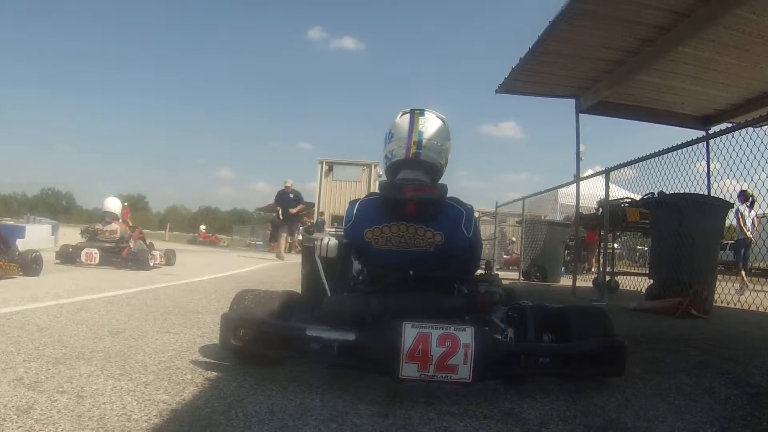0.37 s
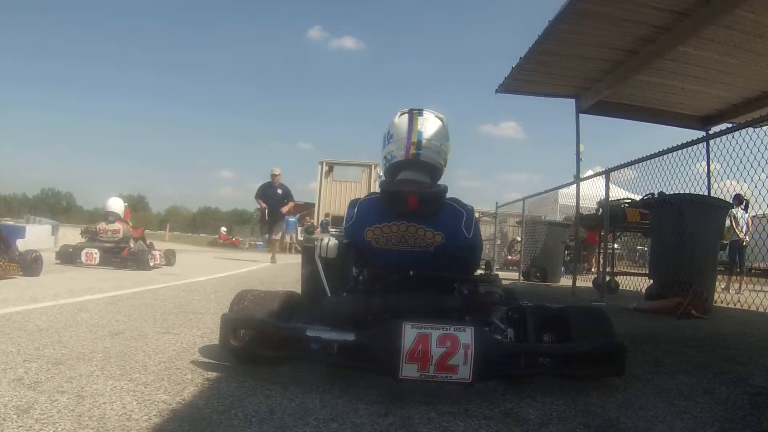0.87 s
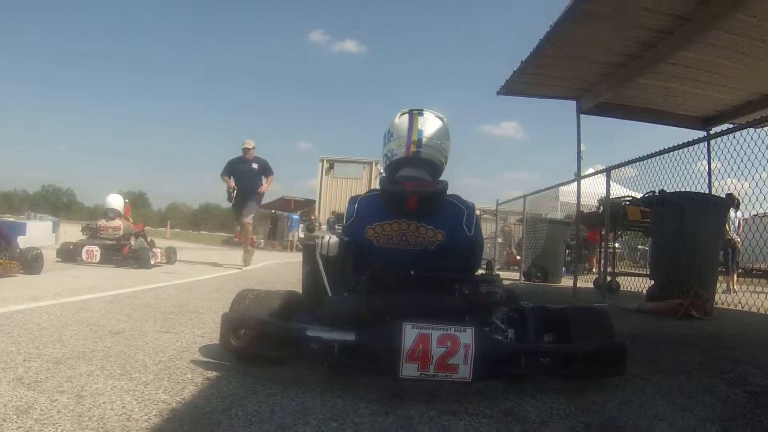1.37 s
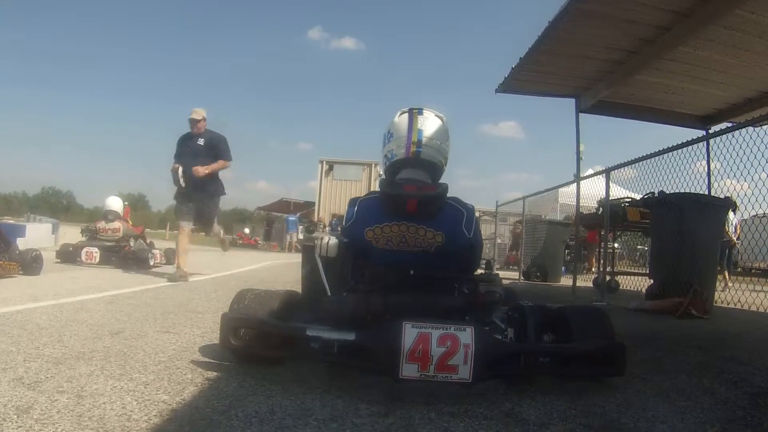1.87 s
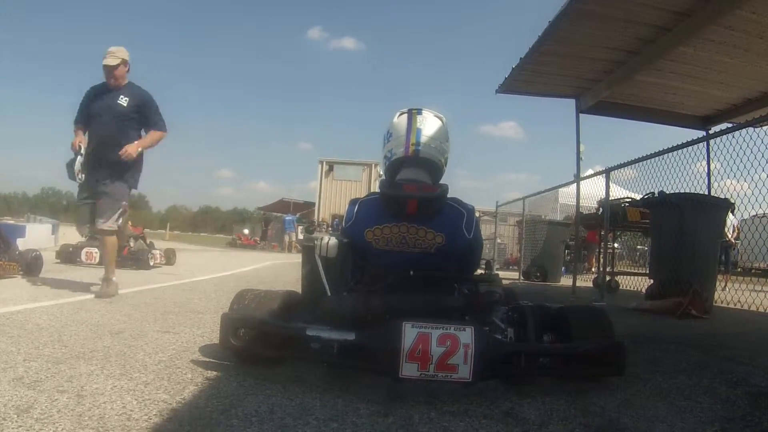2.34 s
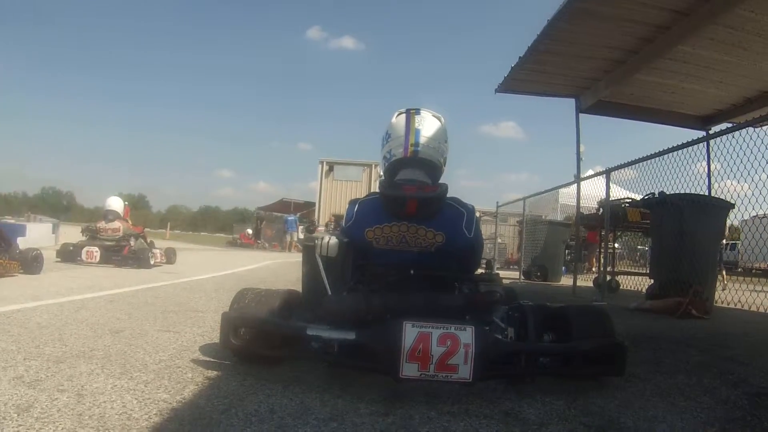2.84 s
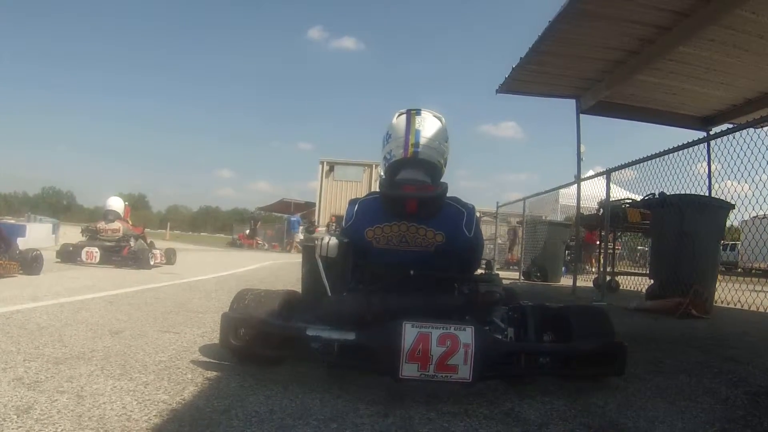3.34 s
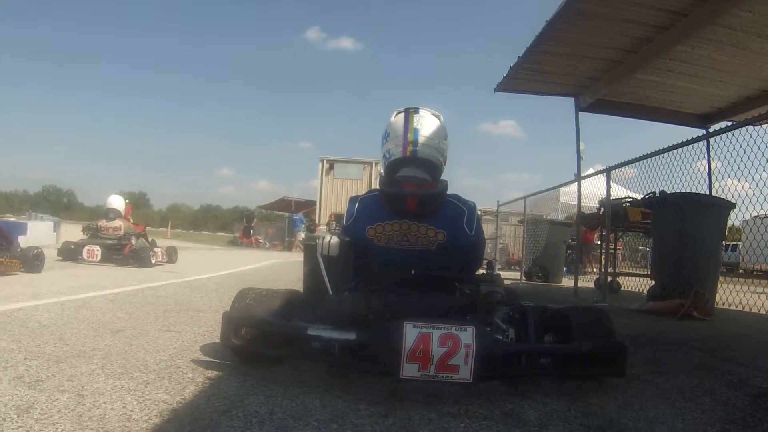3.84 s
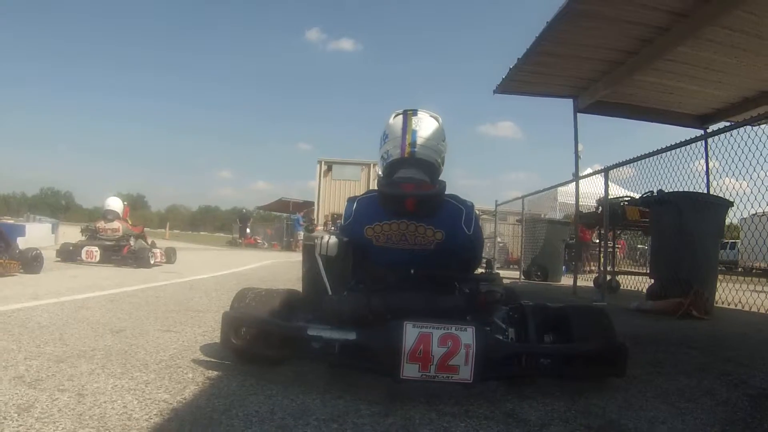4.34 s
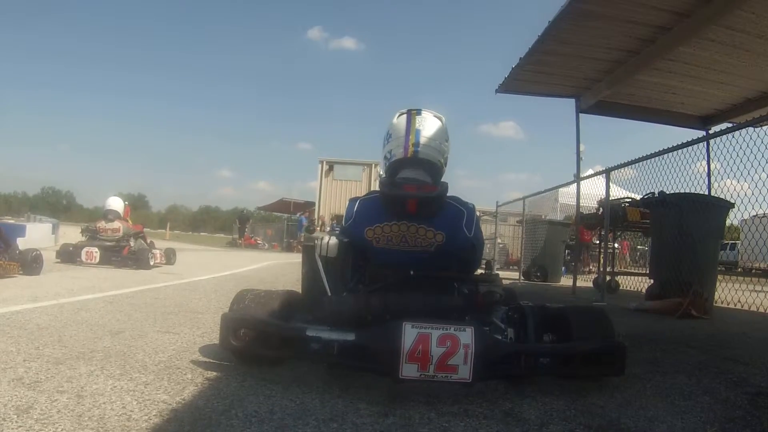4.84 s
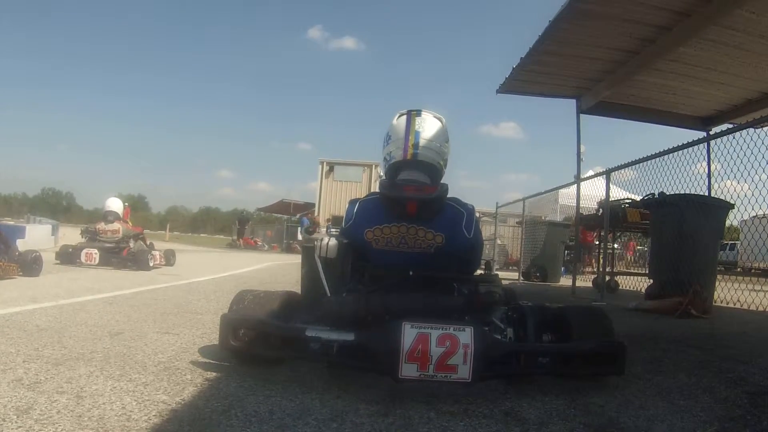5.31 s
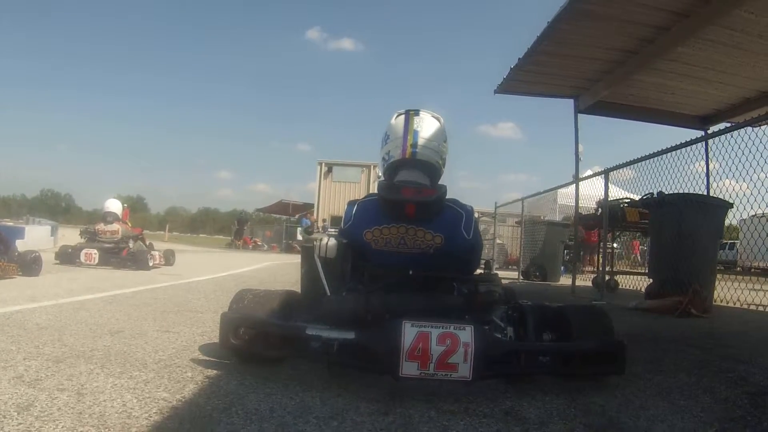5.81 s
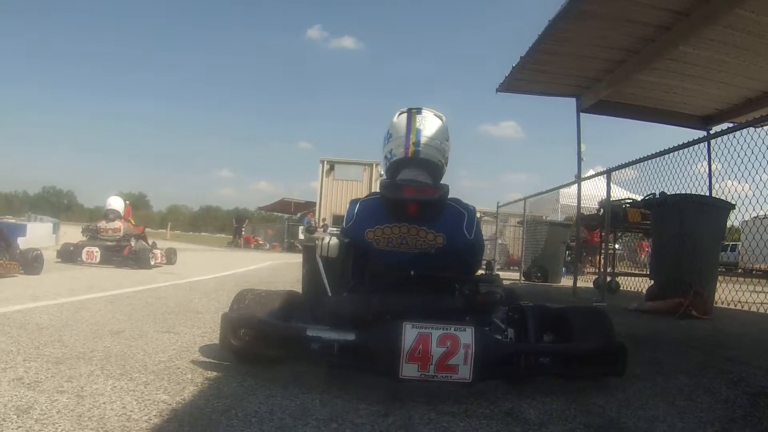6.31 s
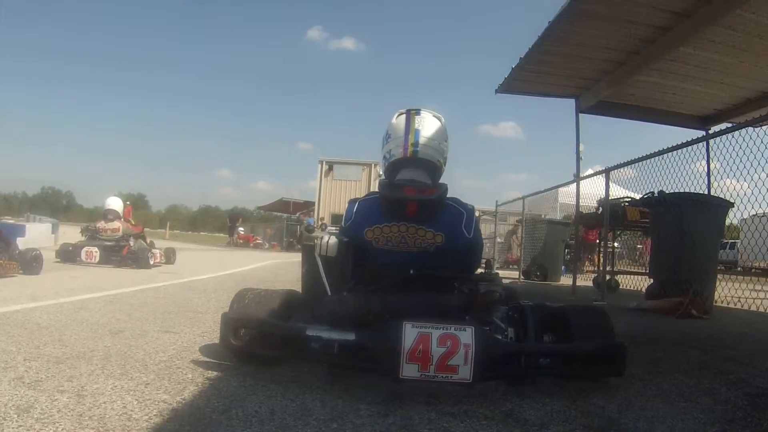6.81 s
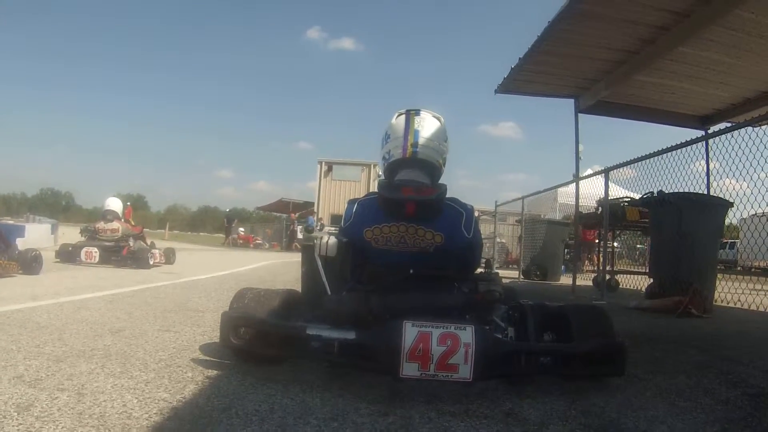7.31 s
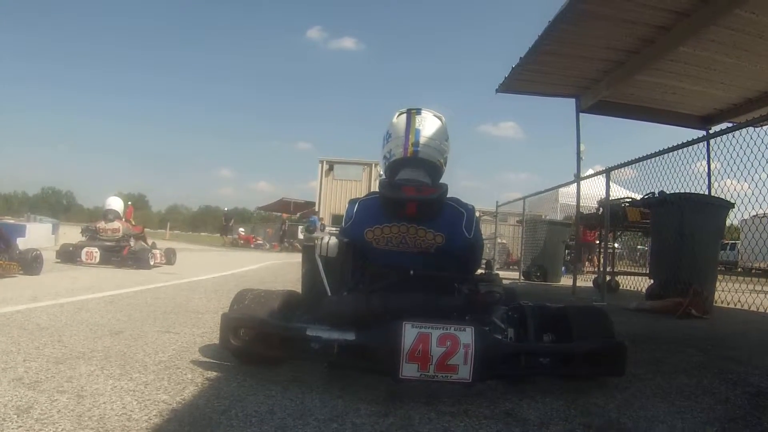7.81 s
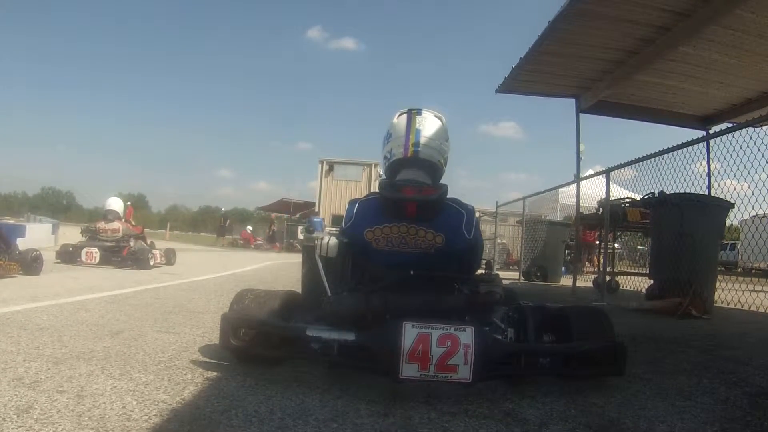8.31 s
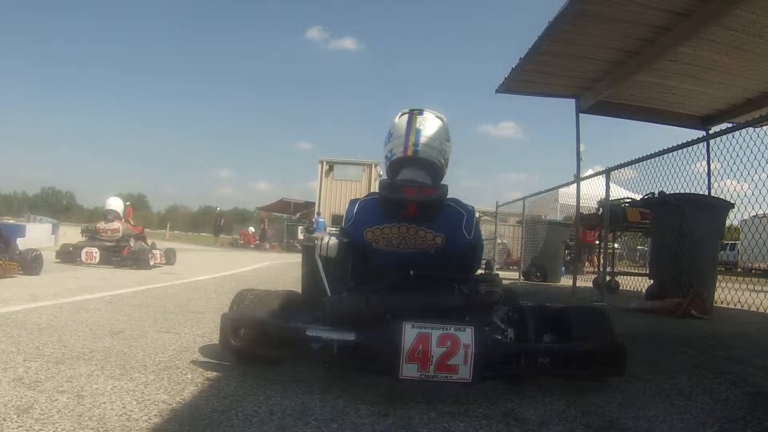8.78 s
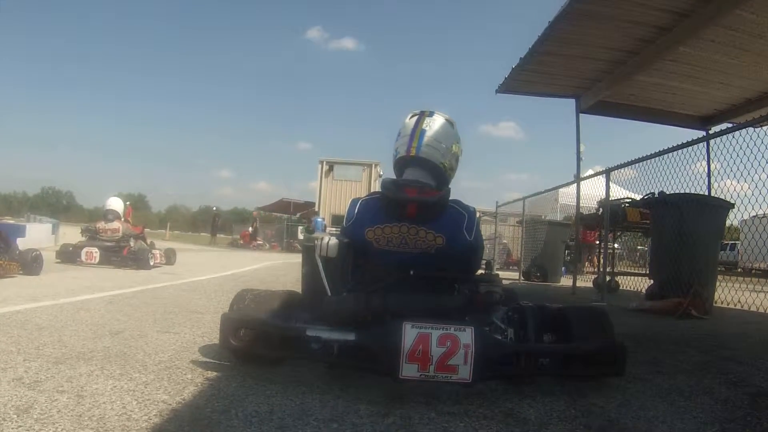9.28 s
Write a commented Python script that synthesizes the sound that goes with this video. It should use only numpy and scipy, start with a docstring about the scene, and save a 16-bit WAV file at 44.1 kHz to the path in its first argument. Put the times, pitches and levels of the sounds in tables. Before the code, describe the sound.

A rough two-stroke kart engine blips and rattles close to the microphone, sinks and stalls near eight seconds, leaving a neighbour's popping idle.

```python
"""A rough two-stroke engine shakes a camera on a kart, over the drone of a grid and a neighbour's idling pops.
The near engine sums shaft orders, frame ringing, burning noise and clatter; it hunts, fires unevenly and stalls.
Strong firings jolt the mount, and knocks and loose chatter ring the housing, most densely at high revs.
Distant engines are patchy noise with thin hissing bands; the neighbour's pops are struck exhaust rings.
After the stall the mount sways, and the camera's gain control slowly lifts what is left."""
import sys
import numpy as np
from scipy import signal
from scipy.io import wavfile
from scipy.ndimage import uniform_filter1d

SR = 44100
rng = np.random.default_rng(int(sys.argv[2]) if len(sys.argv) > 2 else 0)


def natural_amplitude(level_db):
    """Convert a level in decibels to a linear amplitude factor, elementwise."""
    exponent = np.asarray(level_db, float) / 20
    return 10 ** exponent


def transcribe(u):
    """Save the signal u as a 16-bit wav file named by the first command-line argument.

    u: samples, shape (n,) or (channels, n), limited to [-1, 1]; the rate is SR.
    q: integer samples, one column per channel.
    """
    v = np.clip(np.atleast_2d(u).T, -1, 1)
    q = np.round(v * 32767).astype(np.int16)
    wavfile.write(sys.argv[1], SR, q)


N = 426006


def evened(x):
    """Scales to rms 1."""
    return x / np.sqrt(np.mean(x ** 2) + 1e-20)


def curves(rows):
    """Joins table rows by straight lines, one array for each column after time."""
    s, *columns = np.transpose(rows)
    return [np.interp(np.arange(N) / SR, s, c) for c in columns]


def clicks(s, size):
    """Single samples of the given size at the given times."""
    train = np.zeros(N)
    places = np.clip(np.round(np.asarray(s) * SR).astype(int), 0, N - 1)
    np.add.at(train, places, size)
    return train


def ring(x, modes, turn=1):
    """Passes x through decaying resonances of joint energy 1; turn -1 fills the dips between neighbours."""
    t = np.arange(8192) / SR
    body = np.zeros(len(t))
    for k, (hz, width, db) in enumerate(modes):
        decay = np.exp(-np.pi * width * t) * (1 - np.exp(-hz * t))
        body += turn ** k * natural_amplitude(db) * np.sqrt(width) * decay * np.sin(2 * np.pi * hz * t)
    return signal.oaconvolve(x, body / np.linalg.norm(body))[:N]


# near engine's speed and effort: [t/s, shaft speed/(turns per s), effort level/dB]
ENGINE_SPEED = [(0, 49.5, -9.5), (.09, 47.4, -3.5), (.18, 33.8, -1), (.33, 35, -0.5), (.41, 37.4, -3.5),
                (.52, 37.4, 2), (.62, 33.4, 0), (.8, 31, -2), (.85, 27.2, -2), (.91, 30.4, -1.5),
                (1.0, 27.3, -1.5), (1.12, 27.5, 0), (1.2, 39, -1.5), (1.3, 53.6, -4.5), (1.43, 51.5, -9),
                (1.62, 52.8, -6), (1.71, 47, -5.5), (1.88, 45, -0.5), (2.04, 41, -1.5), (2.1, 45.1, -3.5),
                (2.22, 43.5, 0), (2.28, 39, 2), (2.45, 30.3, 0), (2.62, 28.2, -3), (2.68, 33.6, -3.5),
                (2.88, 25.4, -1), (3.01, 46, -1.5), (3.17, 35.4, -1), (3.27, 50.3, -3.5), (3.38, 47.6, -4),
                (3.5, 39.2, -0.5), (3.7, 30.6, -1.5), (3.82, 25.3, 0.5), (4.1, 25, 1), (4.14, 30.9, -3.5),
                (4.38, 24.1, -0.5), (4.47, 33.8, -1), (4.52, 47.3, -4), (4.61, 54.5, -11), (4.8, 39, -2.5),
                (5.0, 31, 0), (5.08, 32, -2), (5.2, 33, -3), (5.24, 32.8, -6), (5.39, 26, -1),
                (5.45, 28.3, -4), (5.86, 21.8, 3), (5.93, 32.1, -2.5), (6.12, 24.4, -1.5), (6.22, 28.4, -1),
                (6.35, 28, -4.5), (6.43, 43, -4.5), (6.59, 43.2, 0.5), (6.75, 35, 0.5), (6.9, 25.5, 0.5),
                (7.0, 20.2, 3), (7.15, 20.1, 5.5), (7.28, 20.8, -1), (7.56, 20.3, 0.5), (7.62, 18, 2.5),
                (7.81, 16.5, -1.5), (8.1, 21.3, -12)]
# shaft orders: [multiple of shaft speed, level/dB, phase/rad]
SHAFT_ORDERS = [(1, -17, 0.5), (2, -18, 0.72), (3, -26.5, 2.1), (4, -34.5, 3), (5, -31, 3.64),
                (6, -35.5, 0.03), (7, -43, 1.98)]
# how the mount passes shaking on to the microphone: [f/Hz, level/dB]
MOUNT_RESPONSE = [(14, -11.5), (22, -1), (30, 2), (40, -11.5), (52, -14), (65, -4), (80, 1), (92, 3),
                  (101, 0.5), (112, -8), (128, -6), (150, -5), (195, 3), (235, -8.5), (295, 6), (340, -2.5),
                  (420, -43)]
# frame and pipe resonances: [f/Hz, width/Hz, level/dB]
FRAME_MODES = [(99.8, 23, 8.5), (156.3, 70, 3), (207.4, 53.3, 7), (256.8, 34.6, 2), (288.6, 28.5, 5),
               (335, 40, -18), (412, 150, -40.5), (570, 180, -52.5)]
# soft camera mount: [f/Hz, width/Hz, level/dB]
MOUNT_MODES = [(20.5, 15, -2), (55.3, 68, 13)]


def engine():
    """Shaft orders shake the mount; each turn kicks the frame with a pulse and a puff of noise, and clatters."""
    hz, effort_db = curves(ENGINE_SPEED)
    turns = np.cumsum(hz) / SR
    since_turn = turns % 1
    stop_s = ENGINE_SPEED[-1][0]
    running = np.clip((stop_s - np.arange(N) / SR) / 0.18, 0, 1)
    # coasting: slowing down from above 32.2 turns a second; burning noise drops and firing is steadier
    coasting = uniform_filter1d(1. * (np.gradient(hz) < 0) * (hz > 32.2), size=3000)
    steadiness = 1 - coasting / 2
    coast_gain = natural_amplitude(-1.5 * coasting)
    stall_db = 4.5 * np.maximum(21 - hz, 0)  # ringing dies below 21 turns a second

    # each order wavers a few times a second
    waver = rng.standard_normal((len(SHAFT_ORDERS), N // 400 + 1))
    waver = uniform_filter1d(waver, size=8, axis=1)
    f, passed_db = np.transpose(MOUNT_RESPONSE)
    orders = np.zeros(N)
    for (k, db, phase), w in zip(SHAFT_ORDERS, waver):
        waver_db = 3.5 * np.interp(np.arange(N) / 400, np.arange(len(w)), evened(w))
        mount_db = np.interp(np.log(k * hz), np.log(f), passed_db)
        level_db = db + effort_db + mount_db + waver_db * steadiness - (k > 1.5) * stall_db
        orders += natural_amplitude(level_db) * np.cos(2 * np.pi * round(k) * turns + phase)

    # the frame rings harder just after a strong firing
    after_db, after_s = 10, 0.012
    s, db = np.transpose(STRONG_FIRINGS)
    hits = clicks(s, np.minimum(natural_amplitude(db + 13), 1))
    after = signal.lfilter([1], [1, -np.exp(-1 / (after_s * SR))], hits)
    frame_db = -22.5 + effort_db + 0.3585 * (hz - 30) - stall_db  # grows with speed
    frame_db += after_db * uniform_filter1d(after, size=400)

    # no two turns push, puff or clatter alike
    push, puff, clack = rng.standard_normal((600, 3))[turns.astype(int)].T
    kicks = (np.diff(np.floor(turns), prepend=0) > 0) * natural_amplitude(1.5 * push * steadiness)
    puffs = rng.standard_normal(N) * (1.0 + np.exp(-since_turn / 0.7)) * natural_amplitude(2.0 * puff)
    soft = signal.windows.hann(61)
    kicked = ring(signal.oaconvolve(-kicks / np.sqrt(hz), soft, "same"), FRAME_MODES)
    burning = ring(signal.oaconvolve(puffs, soft, "same"), FRAME_MODES[1:])
    drive = evened(kicked) + 0.77 * coast_gain * evened(burning)
    # uneven burning jostles the mount
    shudder = coast_gain * evened(ring(ring(puffs, MOUNT_MODES), MOUNT_MODES))
    scrape = rng.standard_normal(N) * np.exp(-since_turn / 0.12) * natural_amplitude(6.3 * clack)
    clatter = ring(scrape, HOUSING_RINGS[0])
    uneven = natural_amplitude(2.5 * uniform_filter1d(push, 500) * (1 - coasting))
    shaking = np.sqrt(2) * orders * uneven
    ringing = natural_amplitude(frame_db) * (0.83 * drive + natural_amplitude(-15.5) * clatter + natural_amplitude(-1.5) * shudder)
    return running * (shaking + ringing)


# spectrum of the grid's drone: [f/Hz, relative level per Hz/dB]
DRONE_SPECTRUM = [(20, -4), (45, -1.5), (80, -7), (135, 14), (175, -11), (225, 14), (310, 14), (372, 3.5),
                  (581, 0), (768, -8), (960, -6.5), (1300, -1), (2470, -13), (3460, -23.5), (6000, -25),
                  (9000, -33), (10000, -42.5), (12000, -38.5), (15600, -72)]
# swell of the drone: [t/s, level/dB, treble tilt above 1200 Hz/(dB per octave)]
DRONE_SWELL = [(0, -39.5, -2), (5, -40.5, -2.5), (7.1, -41.5, 0), (7.25, -46, -0.5), (7.45, -41.5, 0.5),
               (7.9, -42, 4.5), (8.8, -44.5, 5), (9.1, -44, 4), (9.66, -45.5, 2.5)]
# thin hissing bands in the drone: [f/Hz, width/Hz, level/dB, start t/s, stop t/s]
HISSING_BANDS = [(5042, 100, -60.5, 7.42, 8.55), (5250, 170, -65, 8.6, 10), (5400, 250, -74, 0, 10),
                 (6050, 350, -69, 7.3, 10), (8900, 240, -79, 0, 7.5), (1620, 200, -47, 8.9, 9.03),
                 (2700, 500, -51, 8.9, 8.98), (3300, 300, -57, 8.93, 9.0), (5180, 200, -60, 8.9, 9.0),
                 (6000, 250, -64, 8.9, 9.1), (7900, 300, -74, 7.6, 9.3), (11388, 500, -80, 7.5, 9.3)]


def drone():
    """Many distant engines blur into patchy noise with a few thin whistles."""
    def sound(spectrum):
        return signal.istft(spectrum, nperseg=1024, noverlap=768)[1]

    frames, hz = N // 256 + 5, np.fft.rfftfreq(1024, 1 / SR)
    a, b, patches = rng.standard_normal((frames, 513, 3)).T
    patches = evened(uniform_filter1d(uniform_filter1d(patches, 12, 0), 8, 1))
    flicker = evened(uniform_filter1d(rng.standard_normal(frames), 3))
    f, db = np.transpose(DRONE_SPECTRUM)
    colour_db = np.interp(np.log(hz + 1), np.log(f), db)[:, None]
    z = (a + 1j * b) * natural_amplitude(colour_db + 1.6 * patches + 1.5 * flicker)
    # the swell sets the level of the 700-3000 Hz band
    band = (hz > 700) & (hz < 3000)
    z /= np.sqrt(np.mean(sound(z * band[:, None]) ** 2))
    level_db, tilt_db = (np.append(c, np.full(1536, c[-1]))[::256][:frames] for c in curves(DRONE_SWELL))
    octaves = np.clip(np.log2(hz / 1200 + 1e-9), 0, 1.2)[:, None]
    z *= natural_amplitude(level_db + tilt_db * octaves)

    t = (np.arange(frames) - 2) * 256 / SR
    unit = sound(a + 1j * b).std()
    for centre, width, db, start, stop in HISSING_BANDS:
        flutter = natural_amplitude(4.5 * evened(uniform_filter1d(rng.standard_normal(frames), 5)))
        on = np.clip(np.minimum(t - start, stop - t) / .1 + 1, 0, 1)  # 0.1 s fades outside the spell
        peak = evened(1 / (1 + (2 * (hz - centre) / width) ** 2))[:, None]
        z += (b + 1j * a) * peak * natural_amplitude(db) * on * flutter / unit
    return sound(z)[:N]


# neighbour's strong firings: [t/s, level/dB]
NEIGHBOUR_POPS = [(0.059, -29.5), (0.098, -29), (0.175, -24.5), (0.381, -25.5), (0.82, -30), (0.867, -31.5),
                  (0.909, -25), (1.072, -22.5), (1.192, -27.5), (1.834, -26.5), (2.022, -24.5),
                  (2.178, -29.5), (2.35, -23), (2.554, -22.5), (2.836, -28.5), (3.132, -26), (3.571, -22.5),
                  (3.654, -36), (3.813, -24.5), (3.97, -25), (4.341, -27), (4.991, -30), (5.108, -31),
                  (5.371, -24), (5.742, -23), (6.127, -29.5), (6.213, -27), (6.348, -23), (6.423, -31),
                  (6.603, -25.5), (6.799, -31.5), (6.889, -23.5), (7.053, -28), (7.104, -34),
                  (7.144, -23.5), (7.358, -27), (7.487, -22), (7.679, -31.5), (7.723, -28.5), (7.817, -19),
                  (7.992, -26.5), (8.072, -31), (8.161, -23), (8.282, -20), (8.466, -30.5), (8.554, -21.5),
                  (8.707, -19), (8.779, -31), (8.89, -27.5), (8.982, -21), (9.167, -23.5), (9.29, -31.5),
                  (9.381, -20), (9.553, -33), (9.633, -29)]
# neighbour's exhaust ring: [f/Hz, relative level/dB, t60/s]
EXHAUST_RING = [(579, -8.5, 0.12), (996, -6, 0.13), (1208, -1.5, 0.12), (1502, 0, 0.024), (1635, -1, 0.026),
                (1896, -0.5, 0.025), (2160, -15, 0.051), (2546, -14, 0.56), (2710, -31, 0.16),
                (2790, -6, 0.021), (3370, -72, .05), (3706, -15.5, 0.041), (4560, -21.5, 0.094),
                (5210, -26.5, 0.054), (6060, -28.5, 0.074)]


def neighbour():
    """Every turn rings the exhaust until the port shuts; strong firings are brighter; a shed wall echoes them."""
    idle_turns_per_s, weak_db = 23.5, -37
    s, db = np.transpose(NEIGHBOUR_POPS)
    # whole turns up to each strong firing; the turns between fire weakly
    count = np.cumsum(np.round(np.diff(s, prepend=0) * idle_turns_per_s))
    idle = np.setdiff1d(np.arange(1, count[-1]), count)
    luck_db = 4.0 * rng.standard_normal(300)[idle.astype(int)]
    weak = clicks(np.interp(idle, count, s), natural_amplitude(weak_db + luck_db))

    t = np.arange(3000) / SR
    port = (1 - np.exp(-(t / 0.0004) ** 2)) * (.06 + .94 / (1 + np.exp((t - .0115) / .0006)))
    tones = [natural_amplitude(d - 60 * t / t60) * np.sin(2 * np.pi * hz * t) for hz, d, t60 in EXHAUST_RING]
    tones = np.array(tones) * port
    tones /= np.sqrt(2 * np.mean(tones.sum(0)[:400] ** 2))
    bright = np.array([hz > 2800 for hz, _, _ in EXHAUST_RING])
    direct = signal.oaconvolve(clicks(s, natural_amplitude(db)) + weak, tones[~bright].sum(0))
    direct += signal.oaconvolve(clicks(s, natural_amplitude(db + 0.25 * (db + 29.5))), tones[bright].sum(0))
    # hot gas hisses out
    hiss = ring(rng.standard_normal(N), [(6540, 3400, 0)])[:len(t)]
    spit = port * natural_amplitude(-60 * t / 0.14) * hiss
    direct += natural_amplitude(-23.5) * signal.oaconvolve(clicks(s, natural_amplitude(db + .5 * (db + 20.5))), spit)
    # turbulence roughens the ring
    gas = signal.lfilter([1], [1, -1.6, .64], rng.standard_normal(len(direct)))
    direct *= 1 + .15 * evened(gas)

    delay = round(.033 * SR)
    direct[delay:] += natural_amplitude(-15) * direct[:-delay]  # wall echo
    t = np.arange(SR // 4) / SR
    yard = rng.standard_normal(len(t)) * natural_amplitude(-60 * t / 0.15) * (t > .008)
    scattered = signal.oaconvolve(direct, yard / np.linalg.norm(yard))[:N]
    return direct[:N] + natural_amplitude(-7.5) * scattered


# near engine's strong firings, which jolt the mount: [t/s, level/dB]
STRONG_FIRINGS = [(0.082, 1), (0.364, 0), (0.565, -8), (1.172, -14), (1.267, -1), (1.887, -24), (2.051, -6),
                  (2.091, -12), (2.6, 1), (2.79, -16), (2.862, -6.5), (3.023, -9), (3.057, -19),
                  (3.235, -7), (3.277, 0), (4.07, -9), (4.165, -19), (4.373, -15), (4.504, 0), (4.547, -1),
                  (4.976, -12), (5.231, -2), (5.405, -8), (5.513, -1), (5.711, -16), (5.906, -2),
                  (6.196, -5), (6.37, -9), (6.429, -9), (6.588, -6), (6.781, -13), (6.925, -13),
                  (7.102, -5), (7.229, -5), (7.351, -5.5), (7.435, -8), (7.569, -14)]


def firings():
    """A smooth inward jolt of a few milliseconds, then the lowest frame mode rings."""
    s, db = np.transpose(STRONG_FIRINGS)
    t = np.arange(-400, 4000) / SR
    jolt = -np.exp(-.5 * (t / 0.0014) ** 2)
    hz, width, _ = FRAME_MODES[0]
    onset = (t > 0) * (1 - np.exp(-(t / 0.0041) ** 2))
    after = -.25 * onset * np.exp(-np.pi * 2.2 * width * t) * np.cos(2 * np.pi * hz * t)
    return signal.oaconvolve(clicks(s, natural_amplitude(db)), jolt + after)[400:N + 400]


# housing knocks: [t/s, level/dB, extra top-ring level/dB, extra low-ring level/dB]
HOUSING_KNOCKS = [(0.084, -40, 0, 16), (0.104, -23, 3, 2), (0.122, -47, 0, 9), (0.361, -31, 5, 7),
                  (0.3855, -24.5, 3, -4.5), (0.405, -46, 0, -4), (0.8815, -33.5, 5, 1),
                  (0.9787, -44, 0, 14), (1.0331, -50, 0, 8), (1.1742, -36, 0, 14), (1.1943, -17.5, -1, -7),
                  (1.2855, -8, 0, 2.5), (1.303, -13, 3, 0), (1.3067, -7.5, 2, 1), (1.3246, -25, 1, 8),
                  (1.3308, -15, 7, 1), (1.3391, -7.5, 3.5, 4.5), (1.345, -8.5, 0, -5), (1.35, -21, 2, 0),
                  (1.3548, -17, 0, 2), (1.3658, -6.5, -1, 4), (1.389, -6.5, 1, -3), (1.395, -20, 3, 6),
                  (1.402, -8, 0, 0.5), (1.4066, -6.5, 3, -7), (1.414, -11, 3, 5), (1.418, -16, 2, -4),
                  (1.425, -20, 10, 7), (1.4434, -16, 3, 4), (1.4475, -6, 3, 2.5), (1.456, -16, 7, -4),
                  (1.474, -25, 7, 2), (1.4824, -6, -2, 3), (1.4974, -15, 12, -7), (1.5213, -3.5, -5, 0),
                  (1.5408, -9, 2, 1), (1.561, -5, -4.5, -1), (1.5779, -16, 0, 4), (1.5835, -11, 3, -12),
                  (1.5871, -9, 3, -1), (1.603, -10.5, -0.5, -1), (1.61, -15, 2, -3), (1.62, -14, 2, -4),
                  (1.628, -11, 3, -1), (1.6434, -9.5, 4, 1), (1.6655, -7.5, 4, 0), (1.68, -16.5, 10, -7),
                  (1.7114, -29, 3, 5), (1.7222, -33, 0, 4), (1.7282, -25.5, 6, 9), (1.754, -20, 5, -1),
                  (1.7686, -15, 3, -1), (2.0685, -20, 4, 1), (2.086, -24, 3, 0), (2.0919, -13, -7, 1.5),
                  (2.1119, -33, 0, 6), (2.131, -40, 2, 3), (2.5072, -40.5, 0, 16), (2.6133, -40, -4, 9),
                  (2.805, -34, -3, 1), (2.821, -33.5, -1, 7), (2.8589, -41, 0, 17.5),
                  (2.9306, -38, -4, 12.5), (2.9475, -28, -4, 9), (2.968, -51, 0, 5), (2.985, -49, 2, 6),
                  (3.03, -24, -1, 6), (3.0498, -24, -6, 2), (3.067, -43, 3, 7), (3.0928, -51, 3, 5),
                  (3.1258, -40, 0, 11), (3.251, -33, 8, -10), (3.2917, -16, 6, 2.5), (3.314, -12, -5, -5),
                  (3.335, -17.5, 2, -3), (3.3533, -23, -2, -9), (3.4131, -55, -2, 6), (3.7928, -51, 2, 4),
                  (3.903, -45, -2, 18), (4.0303, -43, 0, 17), (4.1103, -42, -1, 12), (4.1874, -47, 3, 8),
                  (4.3695, -43, 0, 15), (4.4117, -52, 2, 8), (4.4386, -50, 2, 10), (4.4483, -25, 1, 2),
                  (4.468, -20.5, 9, 5), (4.49, -39, 3, -5), (4.5078, -23, 3, -6), (4.524, -23, 3, -2),
                  (4.5292, -20, 4, -3), (4.5509, -12, 1, -4), (4.5673, -14.5, 12, -1), (4.587, -3, -3, -3),
                  (4.6102, -17, 6, -2), (4.6205, -18, 8, 5), (4.6306, -3, 2.5, 1), (4.641, -20, 3, 0),
                  (4.648, -24, 9, 5), (4.6638, -16, 5, 7), (4.6723, -16, 3, -3), (4.678, -14, 6, 1),
                  (4.683, -16, 11, -3), (4.692, -22, 5, 0), (4.699, -14, 3, 2), (4.706, -18, 4, -1),
                  (4.712, -16, 6, -1.5), (4.718, -11.5, 2, -9), (4.7344, -29, 7, 11), (4.757, -37, 3, 6),
                  (4.7633, -23.5, 3, 6), (4.77, -32, 0, 6), (4.7961, -14.5, 1.5, 5.5), (4.8113, -32, -2, 5),
                  (4.8234, -23.5, 5, 2), (4.8386, -28, 5, 7.5), (5.232, -40, 4, 7), (5.247, -45, 6, 9),
                  (5.472, -45, 3, 14), (5.513, -37.5, 6, 9), (5.7301, -45, -1, 3), (5.8082, -50, -3, 9),
                  (5.8341, -49, -2, 13), (5.8905, -37, -2, 9.5), (5.906, -37, 6, 6), (5.9251, -22.5, -1, 3),
                  (5.94, -34, -4, 0), (5.956, -35, -4, 3), (5.9848, -48, 0, 11), (6.2155, -33, 0, 8),
                  (6.229, -34, 0, -12), (6.245, -27.5, -2, 0), (6.2751, -44, 0, 9), (6.45, -17.5, -4, -1.5),
                  (6.467, -31, 0, -5), (6.708, -47, 3, 7), (6.8723, -43, -2, 13), (7.1944, -47, 3, 10),
                  (7.3185, -51, 0, 12), (7.4026, -41, -2, 17)]
# spells of loose chatter at high revs: [start t/s, stop t/s, level/dB]
CHATTER_SPELLS = [(1.329, 1.421, -27.5), (1.429, 1.571, -30), (1.57, 1.694, -26.5), (4.461, 4.602, -32),
                  (4.606, 4.66, -35), (4.66, 4.729, -24.5)]
# housing resonances, in low, mid and top rings: [f/Hz, width/Hz, level/dB]
HOUSING_RINGS = [
    [(580, 128, 4), (692, 120, -5), (1304, 230, -3.5), (1457, 228, 16), (1645, 230, -18), (2089, 260, 4),
     (2435, 172, -1), (2550, 206, -3), (2950, 550, -10.5)],
    [(3620, 280, 6.5), (4290, 403, 10), (4874, 406, 7), (5537, 413, 6)],
    [(7740, 350, 11), (8830, 310, -7), (11360, 750, 11), (11750, 3100, -0.5), (13300, 780, -9)],
]
# contact time felt by the [low, mid, top] ring: [t/s]
CONTACT_TIMES = (.001, .0008, .0007)
# size of the bounces beside their knock, for the [low, mid, top] ring: [ratio]
BOUNCE_SIZES = (0.11, 0.073, 0.043)
# clean click at the top of each contact, for the [low, mid, top] ring: [factor]
CONTACT_SNAPS = (3, 7, 2)


def rattle():
    """Each knock is a short scratchy contact that rings the housing; small bounces crowd around it."""
    chatter_per_s, colour_db = 140, 2.5
    s, db, top, low = np.transpose(HOUSING_KNOCKS)
    for start, stop, spell_db in CHATTER_SPELLS:
        when, size = rng.random((int(chatter_per_s * (stop - start)), 2)).T
        s = np.append(s, start + (np.arange(len(when)) + when) / chatter_per_s)
        db = np.append(db, spell_db + 10 * size - 5)
    # chatter knocks get a random balance of rings
    low, top = (np.append(c, colour_db * rng.standard_normal(len(s) - len(c))) for c in (low, top))
    # softer knocks have less top and relatively more low
    low_db = -11.5 + 0.89 * (db + 17.0) + low
    mid_db = -2 + db
    top_db = -25.5 + 1.71 * (db + 14.5) + top

    t, out = np.arange(2000) / SR, np.zeros(N)
    bounces = (rng.random(N) < 250 / SR) * natural_amplitude(3.0 * rng.standard_normal(N))
    # knocks land on two spots whose rings lie 2 % apart from the table, alternately up and down
    spot, spot_shift = uniform_filter1d(rng.standard_normal(N), size=300) > 0, .02
    layers = zip((low_db, mid_db, top_db), HOUSING_RINGS, CONTACT_TIMES, BOUNCE_SIZES, CONTACT_SNAPS)
    for ring_db, modes, contact_s, bounce, snap in layers:
        knocks = clicks(s, natural_amplitude(ring_db))
        shaking = signal.oaconvolve(knocks, signal.windows.hann(2001), "same")
        strikes = knocks + bounce * shaking * bounces
        contact = t / contact_s * np.exp(1 - t / contact_s) + 0.03 * np.exp(-t / 0.003)
        scratch = signal.oaconvolve(strikes, contact)[:N] * rng.choice([-.6, .6], N)
        scratch += snap * np.roll(strikes, round(contact_s * SR))
        # the closed shell passes little between its rings
        shell = [(hz, 3 * width, 0) for hz, width, _ in modes]
        inside = natural_amplitude(-10.0) * ring(scratch, shell, turn=-1.042) + 0.16 * scratch
        turn = -1 if modes is HOUSING_RINGS[1] else 1  # the mid ring has its dips filled
        for here, side in ((spot, 1), (~spot, -1)):
            shifted = [(hz * (1 + side * spot_shift * (-1) ** k), width, level)
                       for k, (hz, width, level) in enumerate(modes)]
            out += ring(inside * here, shifted, turn=turn)
    return out


def sway():
    """With the near engine dying away the mount rocks gently and unevenly at its own low pitch."""
    from_s, sway_hz, sway_db = 7.95, 21.2, -35
    t = np.arange(N) / SR
    wander = 1 + 0.04 * evened(uniform_filter1d(rng.standard_normal(N), 4000))
    unrest = uniform_filter1d(uniform_filter1d(rng.standard_normal(N), 3000), 3000)
    fitful = natural_amplitude(sway_db + 4 * evened(unrest))
    rocking = np.sqrt(2) * fitful * np.sin(2 * np.pi * np.cumsum(sway_hz * wander) / SR)
    # noise through the mount's upper mode, rising 3.2 dB a second
    gusts = natural_amplitude(-41.5 + 3.2 * (t - 10.0)) * evened(ring(rng.standard_normal(N), MOUNT_MODES[1:]))
    start = np.clip((t - from_s) / 0.11, 0, 1)
    return start * (gusts + rocking)


def scene():
    """All sources reach one microphone."""
    return (engine() + drone() + neighbour() + firings() + rattle() + sway())[None]


def low_pass(x):
    """Removes everything above the highest recorded frequency."""
    return signal.sosfilt(signal.butter(12, 15700, fs=SR, output="sos"), x)


def record(dry):
    """Gain control falls at once on loud sound and recovers slowly; peaks round off and the top is cut."""
    power_db = 10 * np.log10(abs(uniform_filter1d(dry[0] ** 2, 1500)) + 1e-12)
    fall_db = np.arange(N) * 16.2 / SR  # the held level falls 16.2 dB a second
    held_db = np.maximum.accumulate(power_db + fall_db) - fall_db
    gain_db = -.25 * np.maximum(uniform_filter1d(held_db, 800) + 22, 0) + 4
    rounded = np.tanh(dry * natural_amplitude(gain_db) / 1.236) * 0.93
    edge = signal.butter(10, 14500, fs=SR, output="sos")
    mix = signal.sosfilt(edge, rounded)
    return low_pass(mix)


dry = scene()
out = record(dry)
transcribe(out)
```